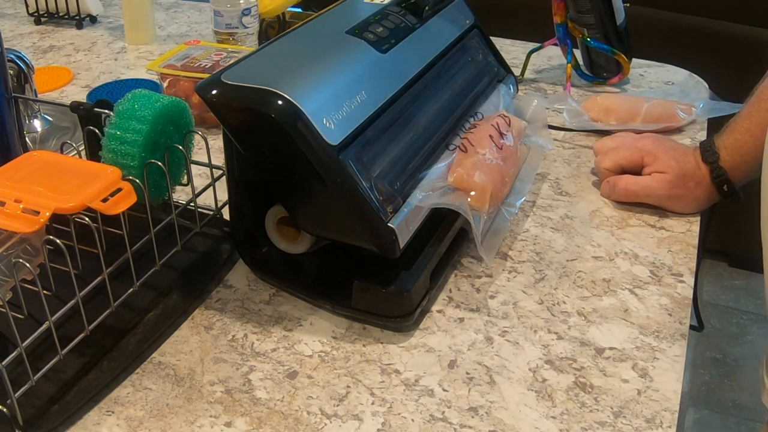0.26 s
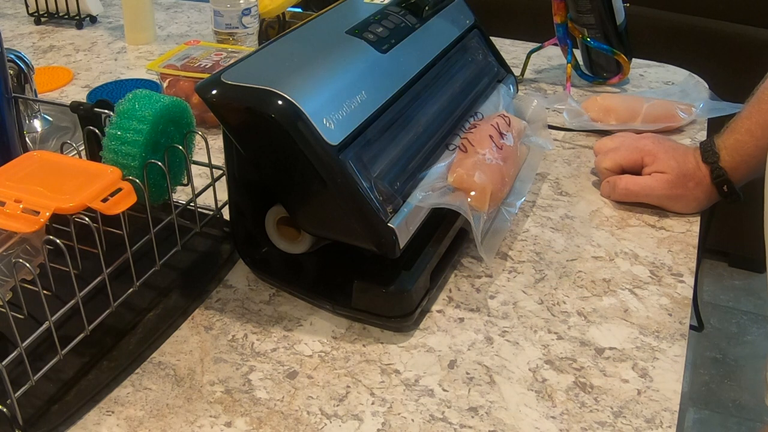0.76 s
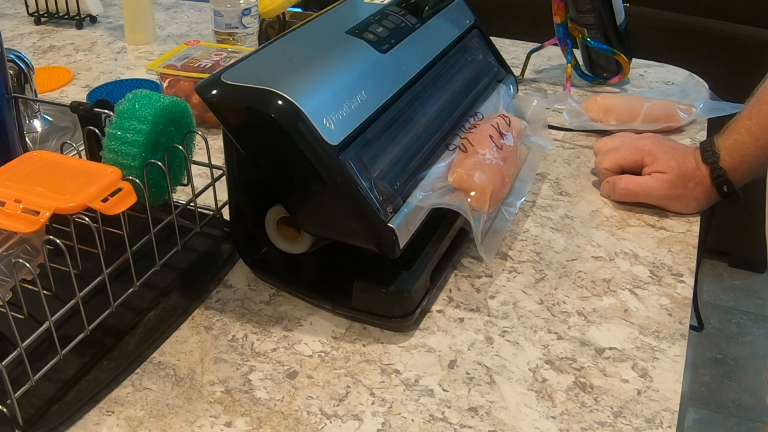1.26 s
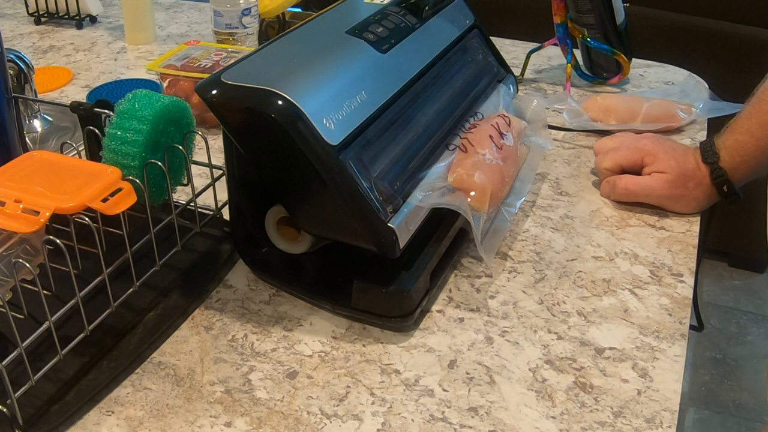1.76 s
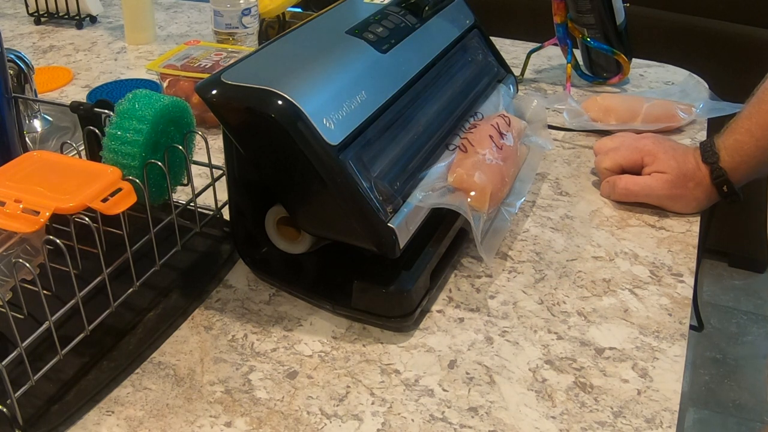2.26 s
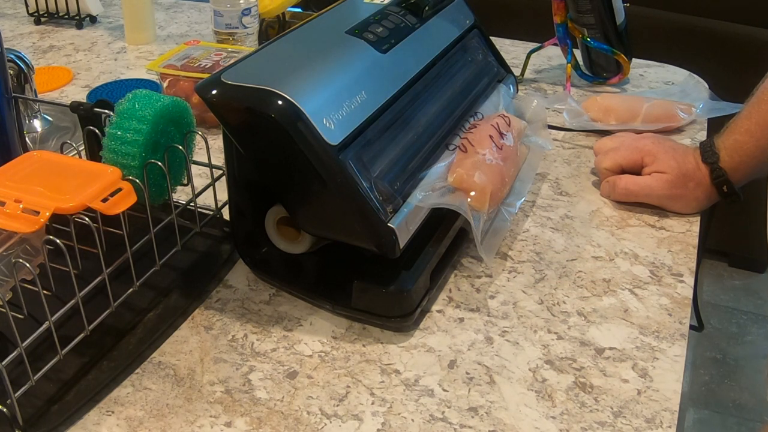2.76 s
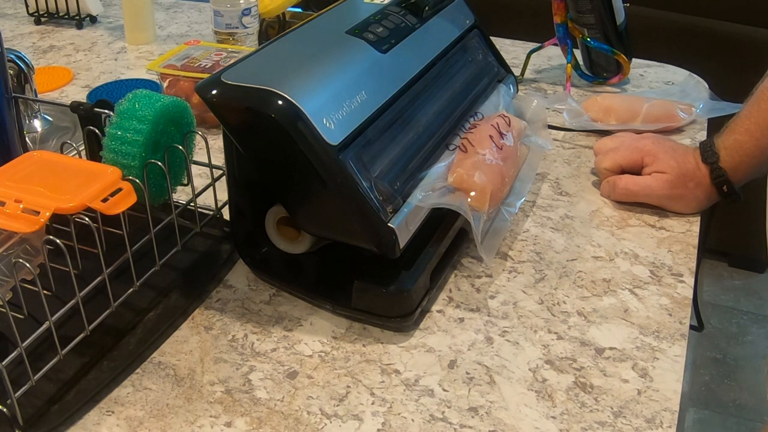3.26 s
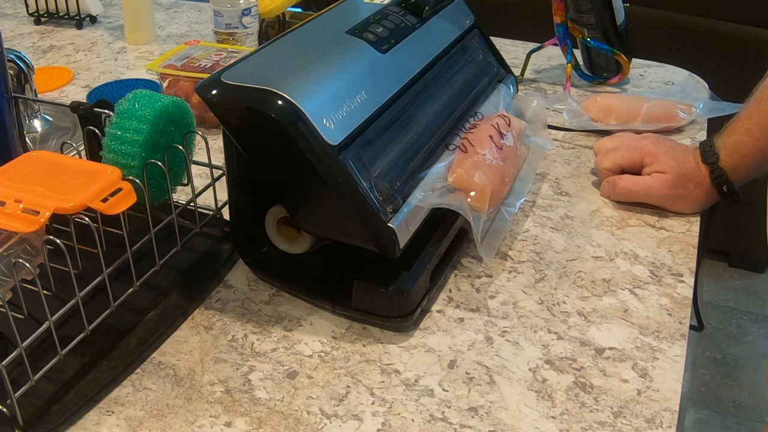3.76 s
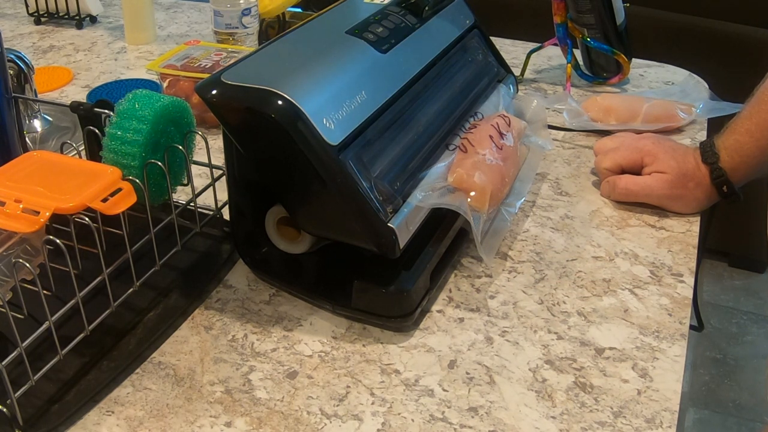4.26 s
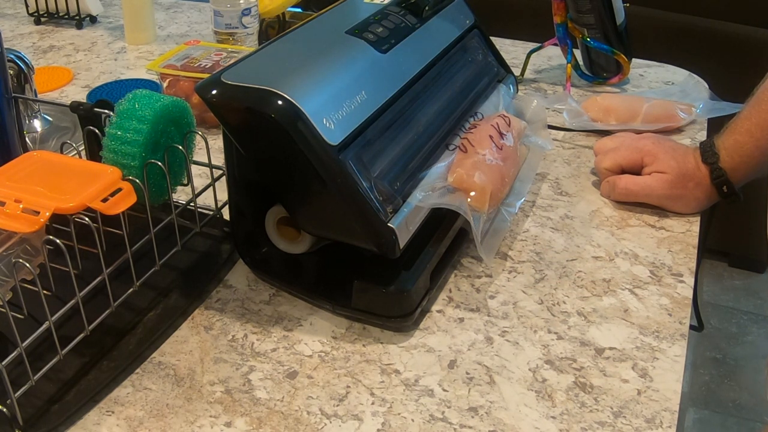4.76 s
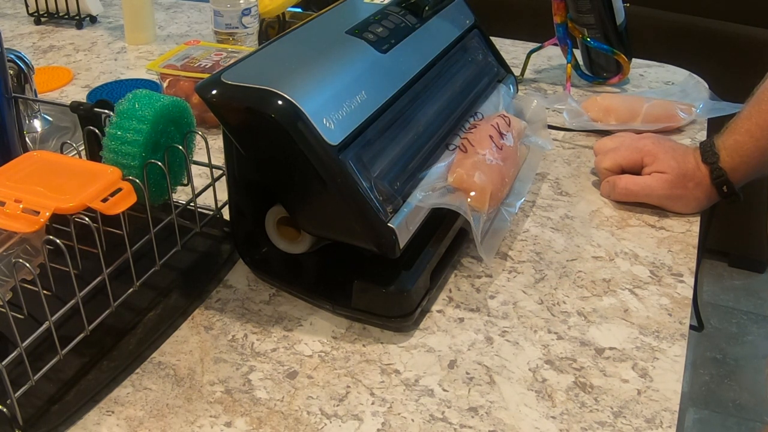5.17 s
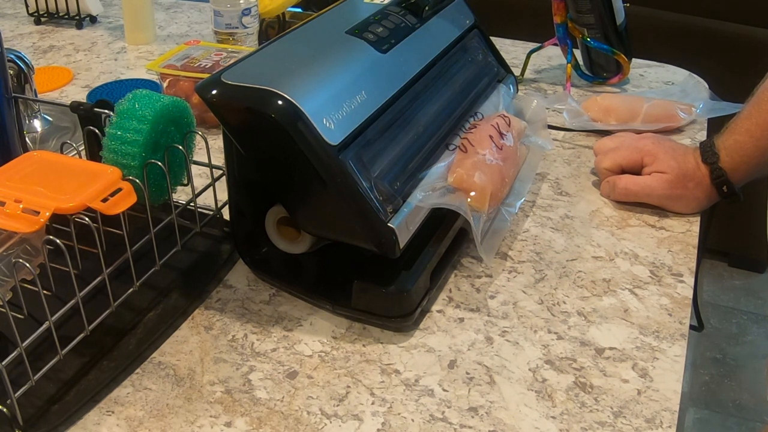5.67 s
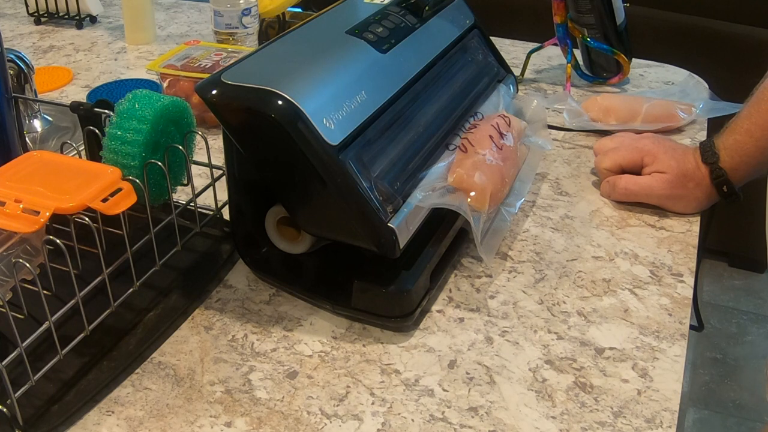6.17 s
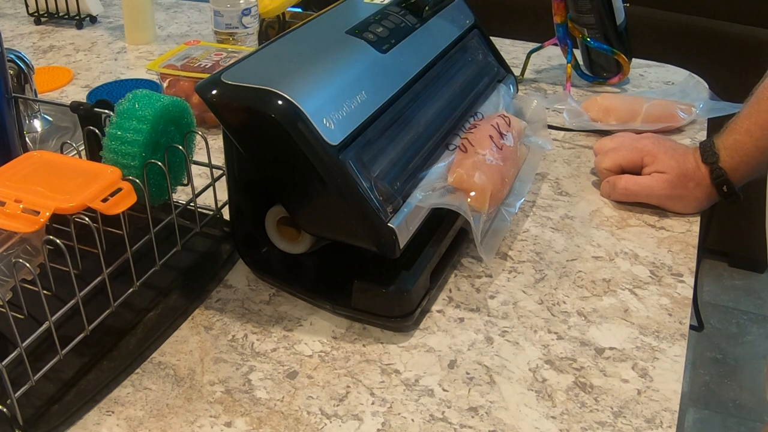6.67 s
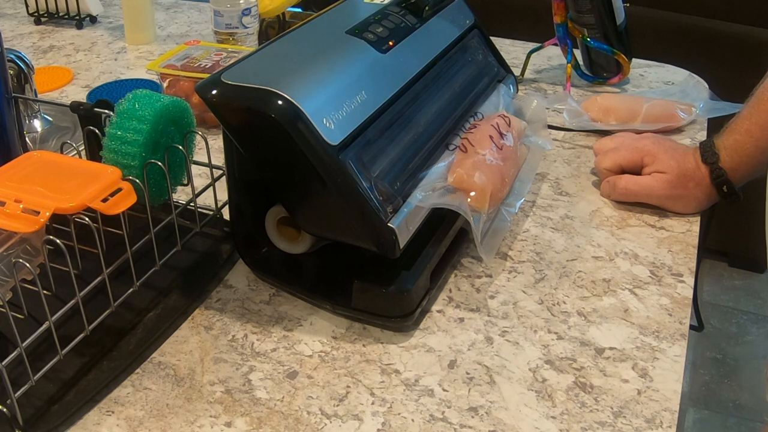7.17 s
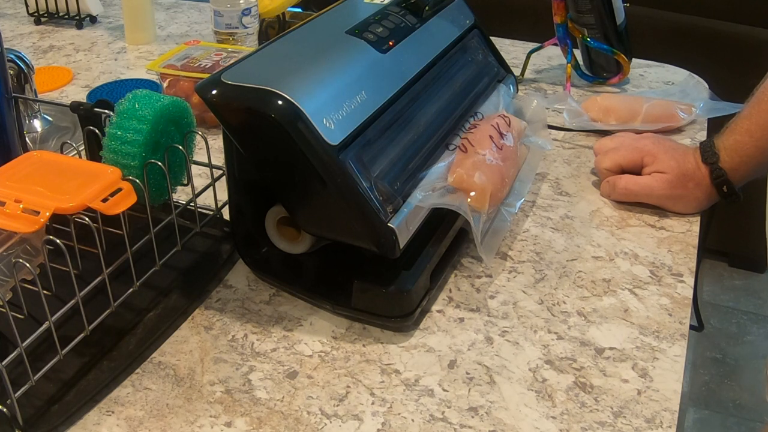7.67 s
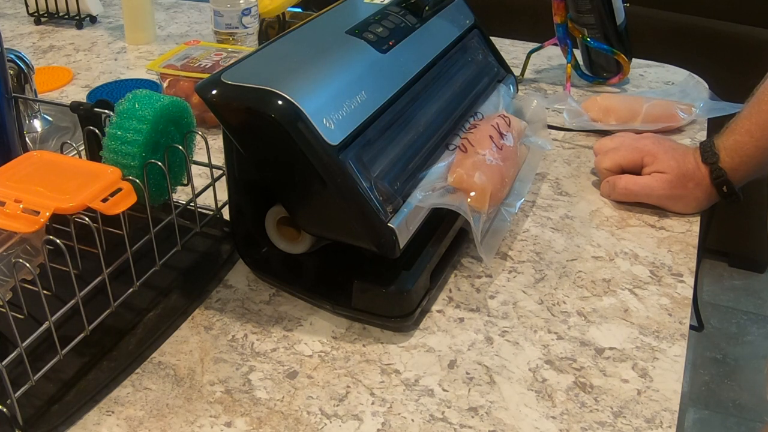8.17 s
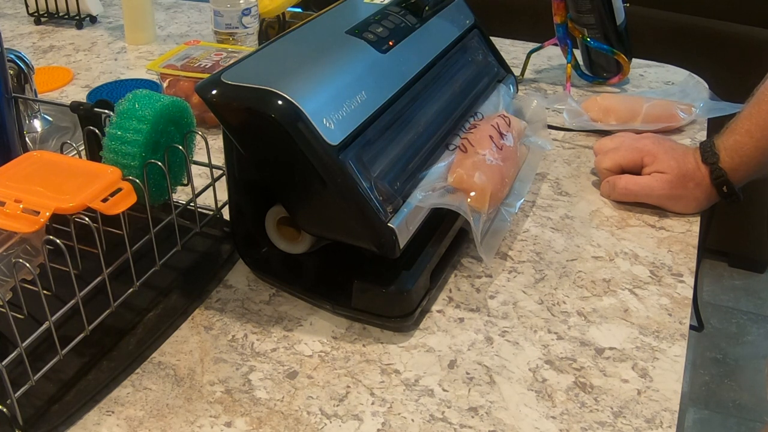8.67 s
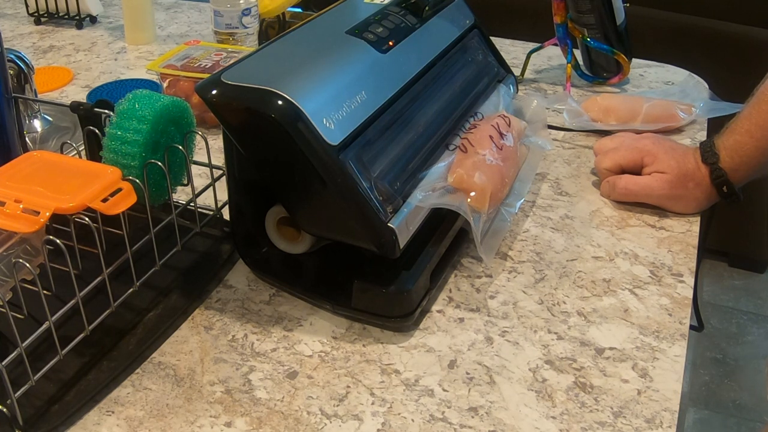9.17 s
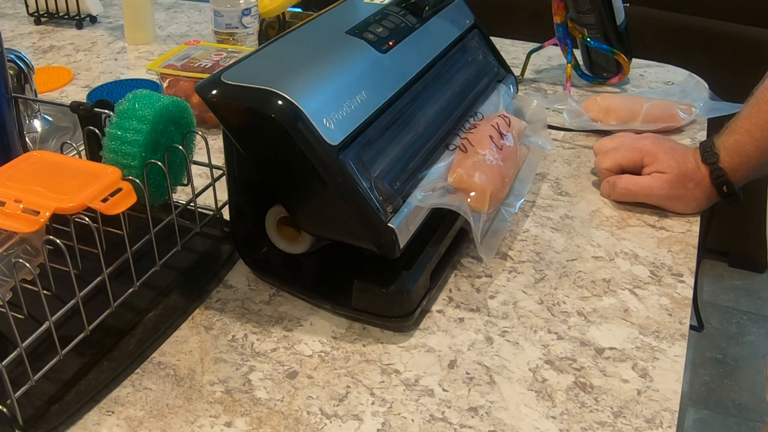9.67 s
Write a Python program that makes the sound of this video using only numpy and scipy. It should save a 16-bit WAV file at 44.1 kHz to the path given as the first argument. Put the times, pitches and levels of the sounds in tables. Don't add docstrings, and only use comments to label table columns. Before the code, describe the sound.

A small vacuum sealer pump hums and rattles loudly on a kitchen counter, then cuts off with a click and clunk, leaving a faint refrigerator drone.

```python
import sys
import numpy as np
from scipy import signal
from scipy.fft import rfft, irfft, next_fast_len
from scipy.io import wavfile

SR = 44100
rng = np.random.default_rng(int(sys.argv[2]) if len(sys.argv) > 2 else 0)


def ratio_of_db(decibels):
    return 10 ** (np.asarray(decibels, float) / 20)


def materialize(psi):
    bounded = np.clip(np.atleast_2d(psi).T, -1, 1)
    quanta = np.round(bounded * 32767).astype(np.int16)
    wavfile.write(sys.argv[1], SR, quanta)


N = 437899
TIME = np.arange(N) / SR
PADDED = next_fast_len(N + SR)
BIN_HZ = np.maximum(np.arange(PADDED // 2 + 1) * SR / PADDED, 1)


# t/s, speed/turns per s
MOTOR_SPEED = [
    (0, 99.6),
    (0.75, 100.6),
    (1.6, 101.02),
    (2.8, 101.27),
    (3.6, 101.07),
    (4.0, 101.65),
    (4.7, 101.8),
    (6.4, 101.62),
    (7.2, 101.72),
]
# t/s, peak level/dB
KNOCKS = [
    (7.217, -10.5),
    (7.276, -23.5),
    (7.2944, -34),
    (7.3203, -32),
    (7.39, -34),
    (7.4394, -37.5),
]
# f/Hz, side minus mid level/dB
PUMP_WIDTH = [(30, -12), (60, -30.5), (110, -18.5), (200, -43.5), (370, -13), (690, -5.5), (1270, -5.5),
              (2330, -12), (4290, -13.5), (7890, -2), (14500, -3.5)]
# f/Hz, left minus right level/dB
PUMP_TILT = [(60, -1.0), (110, -1.0), (200, 0.0), (370, -0.5), (690, -1.0), (1270, -1.5), (2330, -0.5),
             (4290, -0.5), (7890, -2.0), (14500, -1.0)]


def pump():
    cut_s, cut_turn = 7.22, .98
    share, hum_gain, stop_db, shudder_db = run_down(cut_s)
    turns = np.cumsum(np.interp(TIME, *np.transpose(MOTOR_SPEED)) * share) / SR
    turns = turns + 1 + (cut_turn - turns[round(cut_s * SR)]) % 1
    seated = ramp(3.8, 0.15)

    hum = crank_hum(turns, hum_gain)
    orders = valve_orders(turns, seated)
    clatter = case_clatter(turns, stop_db)
    buzz = lid_buzz(turns, seated, stop_db)
    shudder = case_shudder(shudder_db)
    knocks = ratio_of_db(-9) * bursts(KNOCKS, t60=.03, low_hz=900, high_hz=4800)

    near = hum + orders + clatter.sum(axis=0) + buzz + shudder + knocks
    sent_to_room = ratio_of_db(-26) * hum + ratio_of_db(-14) * orders + ratio_of_db(-4) * buzz + knocks
    far_mid, far_side = kitchen(np.vstack([sent_to_room, clatter]))
    both = spread(near + ratio_of_db(-0.5) * far_mid, ratio_of_db(5.0) * far_side, PUMP_WIDTH)
    return colour(both, np.outer([.5, -.5], at_hz(PUMP_TILT, BIN_HZ)))


# order/per turn, level/dB, level of line just above/dB, level of line just below/dB
LOOSE_BAG = [(1, -17, -53, -56), (2, -40.5, -58, -68), (3, -28, -43.5, -55), (4, -30.5, -51.5, -55.5),
             (5, -51.5, -40.5, -57.5), (6, -37.5, -35.5, -47.5), (7, -37.5, -34, -45), (8, -38, -35, -51),
             (9, -32, -41, -46), (10, -43, -51.5, -51.5), (11, -36.5, -44, -50.5), (12, -37, -43, -42),
             (13, -40, -42, -51.5), (14, -42.5, -49, -48), (15, -44.5, -45, -54.5), (16, -45.5, -50, -49),
             (17, -46, -54, -53), (18, -41.5, -50, -49), (19, -52.5, -55, -58), (20, -52, -53.5, -53.5)]
TIGHT_BAG = [(1, -17, -52, -56), (2, -42.5, -53, -68), (3, -27.5, -44.5, -56), (4, -28, -57, -61.5),
             (5, -38.5, -56, -57), (6, -38.5, -38.5, -42.5), (7, -28.5, -45.5, -45.5), (8, -34.5, -47, -51),
             (9, -34, -50, -43.5), (10, -39, -63, -50.5), (11, -35, -41.5, -51), (12, -35.5, -41, -52),
             (13, -37.5, -47.5, -55), (14, -45.5, -49.5, -41.5), (15, -38.5, -48.5, -52.5),
             (16, -40.5, -51.5, -53), (17, -50.5, -49, -57), (18, -56, -52.5, -50), (19, -49, -55, -52.5),
             (20, -50, -56.5, -50.5)]


def valve_orders(turns, seated):
    third_db = -7 * np.exp(-TIME / 1)
    fourth_db = 4.5 * (1 - ramp(1.02, .6))
    with_air_db = {3: third_db, 4: fourth_db}
    ripple = 2 * np.pi * 120.0 * TIME
    out = np.zeros(N)
    for (k, *loose), (_, *tight) in zip(LOOSE_BAG[1:], TIGHT_BAG[1:]):
        k = round(k)
        main, above, below = (a + (b - a) * seated for a, b in zip(loose, tight))
        main = main + with_air_db.get(k, 0)
        phase = np.angle(1 - np.exp(-k / 9 - 2j * np.pi * k * .4))
        phase += 1.1 * rng.standard_normal() * (k > 4)
        beat_db = 0.99 * drift(7.9)
        waver = .007 * k * drift(9)
        start = rng.uniform(0, 2 * np.pi, 2)
        above_angle = 2 * np.pi * (k - 1) * turns + ripple + start[0] + waver
        below_angle = 2 * np.pi * (k + 1) * turns - ripple + start[1] + waver
        out += ratio_of_db(main + 0.41 * drift(1.6)) * np.cos(2 * np.pi * k * turns + phase + waver)
        out += ratio_of_db(above + beat_db) * np.cos(above_angle)
        out += ratio_of_db(below - beat_db) * np.cos(below_angle)
    quiet_s, fade_db_per_s = 7.238, 900
    fade_db = -fade_db_per_s * np.clip(TIME - quiet_s, 0, 1)
    return np.sqrt(2) * ratio_of_db(fade_db) * out


def crank_hum(turns, gain):
    return np.sqrt(2) * ratio_of_db(-16.5) * gain * np.cos(2 * np.pi * turns)


# f/Hz, level/dB per Hz
CLATTER_COLOUR = [(30, -14), (75, -4), (150, -3.5), (370, -5), (520, 0), (2000, -4), (4200, -5), (4400, -7),
                  (6600, -15), (10500, -22.5), (11400, -38.5), (11900, -34.5), (14200, -37.5), (14600, -52)]
# f/Hz, width/Hz, level/dB
CASE_MODES = [(1360, 140, 1.5), (1807, 120, -1), (2243, 170, 1.5), (2440, 58, -0.5), (2707, 320, 6.5),
              (3480, 110, 5.5), (3700, 217, 4), (4080, 170, 3.5), (5100, 300, 2), (7920, 200, 4),
              (8350, 530, 2.5)]


def case_clatter(turns, stop_db):
    case_db = at_hz(CLATTER_COLOUR, BIN_HZ) + 10 * np.log10(1 + humps(CASE_MODES))
    panels = rng.integers(0, 4, N) == np.arange(4)[:, None]
    contacts = rattle(turns, depth_db=5.5, at_turn=.78, grain_db=3.0)
    panel_sounds = rms_one(colour(panels * contacts, case_db)) / 2
    return ratio_of_db(-28 + stop_db) * panel_sounds


# f/Hz, width/Hz, level/dB
LID_MODES = [(641, 19, 0), (739, 70, 1), (800, 100, -1.5)]


def lid_buzz(turns, seated, stop_db):
    loose_db, sealed_db = -36, -40.5
    level_db = loose_db + (sealed_db - loose_db) * seated + stop_db
    contacts = rattle(turns, depth_db=19.0, at_turn=0.94, grain_db=4.5)
    return ratio_of_db(level_db) * rms_one(colour(contacts, 20 * np.log10(humps(LID_MODES))))


def rattle(turns, depth_db, at_turn, grain_db):
    since_slam = turns - at_turn
    force_db = 2.6 * rng.standard_normal(1000)[since_slam.astype(int) % 1000]
    slam = np.exp(-(since_slam % 1) / .2)
    contact = rng.random(N) < 6000 / SR
    grains = ratio_of_db(grain_db * np.minimum(rng.exponential(1, N), 5)) * contact * rng.choice([-1, 1], N)
    level = ratio_of_db((depth_db + force_db) * slam + 1.67 * drift(36))
    return rms_one(level * (grains + 0.36 * rng.standard_normal(N)))


def case_shudder(level_db):
    return ratio_of_db(level_db) * rms_one(colour(rng.standard_normal(N), 20 * np.log10(humps([(190, 390, 0)]))))


# start t/s, length/s, level against the hum/dB
ROCKS = [
    (7.287, 0.033, -14),
    (7.324, .075, -19),
    (7.408, 0.057, -34),
]


def run_down(cut_s):
    coast_s, coast_loss = .22, .45
    share = 1 - coast_loss * (1 - np.exp(-np.maximum(TIME - cut_s, 0) / coast_s))

    stall_s, stall_fade_s, push_db = 7.262, 0.0099, -2
    hum = ratio_of_db(push_db * ramp(stall_s - .03, .04)) * (1 - ramp(stall_s + stall_fade_s / 2, stall_fade_s))
    for s, length, db in ROCKS:
        hum = hum + ratio_of_db(db) * np.sin(np.pi * ramp(s + length / 2, length))

    quiet_s, fade_db_per_s = 7.202, 230
    stop_db = -fade_db_per_s * np.clip(TIME - quiet_s, 0, 1)

    shudder_s, peak_db, rise_db_per_s, fall_db_per_s = 7.28, -28.5, 400, 156
    late = np.clip(TIME - shudder_s, -1, 1)
    shudder_db = peak_db + np.minimum(rise_db_per_s * late, -fall_db_per_s * late)
    return share, hum, stop_db, shudder_db


# f/Hz, t60/s
KITCHEN_T60 = [(60, 0.25), (160, 0.56), (420, 0.6), (1100, 1), (2910, 0.51), (7680, 0.62)]


def kitchen(parts):
    t, tail = np.arange(SR) / SR, 0
    for low in 40 * 2. ** np.arange(9):
        band = signal.butter(2, [low, min(2 * low, .45 * SR)], "band", fs=SR, output="sos")
        fade = ratio_of_db(-60 * t / at_hz(KITCHEN_T60, low * np.sqrt(2))) * (t > .006)
        tail = tail + fade * signal.sosfilt(band, rng.standard_normal((2, len(parts), SR)))
    tail = tail / np.sqrt(np.sum(tail ** 2, axis=2, keepdims=True))
    wet = np.sum(rfft(parts, PADDED) * rfft(tail, PADDED), axis=1)
    return irfft(wet, PADDED)[:, :N]


# f/Hz, level/dB per Hz
DRONE_COLOUR = [(25, -8.5), (42, -12), (60, -23), (110, -21.5), (160, -0.5), (200, -3.5), (320, -1),
                (750, -13.5), (820, -18), (1600, -19.5), (3000, -37), (9000, -41.5), (10800, -58),
                (11500, -74.5)]
# f/Hz, side minus mid level/dB
DRONE_WIDTH = [(60, -5.5), (110, -2), (200, -12), (370, -11.5), (690, 2), (1270, 0.5), (2330, -2),
               (4290, -2.5), (7890, 3), (14500, 0)]
# f/Hz, level/dB
WHINE = [(43.1, -75), (199.2, -64.5), (290.7, -64.5), (360.7, -57), (721.4, -69), (2008, -84.5),
         (3548, -93), (5082, -88), (5259, -95), (5911, -100), (8333, -92.5), (8926, -90), (8985, -95),
         (10169, -102)]


def refrigerator():
    hiss_db = 10 * np.log10(1 + humps([(10300, 220, 11), (7200, 240, 3)]))
    mid, side = colour(rng.standard_normal((2, N)), at_hz(DRONE_COLOUR, BIN_HZ) + hiss_db)
    air = rms_one(spread(mid, side, DRONE_WIDTH)) * ratio_of_db(1.3 * drift(4))
    throb = 1 + .4 * np.cos(2 * np.pi * 59 * TIME)
    lines = 0
    for hz, db in WHINE:
        line = ratio_of_db(db + 2.0 * drift(4)) * np.cos(2 * np.pi * hz * TIME + 0.65 * drift(5.9))
        lines = lines + np.sqrt(2) * line * (throb if hz > 3000 else ratio_of_db(1.5))
    balance = ratio_of_db([[-.45], [.45]])
    return ratio_of_db(-55 + room_gain_db(TIME)) * balance * (air + ratio_of_db(53.5) * lines)


def watch():
    first_s, gap_s, level_db, spread_db = 7.788, .1684, -68, 1.5
    s = np.arange(first_s, N / SR, gap_s)
    db = level_db + room_gain_db(s) + spread_db * rng.standard_normal(len(s))
    return ratio_of_db(1.0) * bursts(zip(s, db), t60=.07, low_hz=6900, high_hz=8600)


def room_gain_db(s):
    return 1.45 * np.maximum(s - 7.8, 0)


def bursts(events, t60, low_hz, high_hz):
    out, t = np.zeros(N + 2000), np.arange(2000) / SR
    shape = ratio_of_db(-60 * t / t60) * np.minimum(t / .001, 1)
    for s, db in events:
        at = round(s * SR)
        out[at:at + 2000] += ratio_of_db(db) * rng.standard_normal(2000) * shape
    band = signal.butter(2, [low_hz, high_hz], "band", fs=SR, output="sos")
    return signal.sosfilt(band, out[:N])


def spread(mid, side, width):
    side = colour(side, at_hz(width, BIN_HZ))
    return np.array([mid + side, mid - side])


def colour(x, db_per_bin):
    return irfft(rfft(x, PADDED) * ratio_of_db(db_per_bin), PADDED)[..., :N]


def humps(modes):
    return sum(ratio_of_db(2 * db) / (1 + (2 * (BIN_HZ - hz) / width) ** 2) for hz, width, db in modes)


def at_hz(points, hz):
    points = np.array(points)
    return np.interp(np.log(hz), np.log(points[:, 0]), points[:, 1])


def drift(rate):
    r = np.exp(-200 * np.pi * rate / SR)
    slow = signal.lfilter([1], [1, -2 * r, r * r], rng.standard_normal(N // 100 + 2002))[2000:]
    return np.interp(np.arange(N) / 100, np.arange(len(slow)), rms_one(slow))


def ramp(middle_s, length_s):
    return np.clip((TIME - middle_s) / length_s + .5, 0, 1)


def rms_one(x):
    return x / np.sqrt(np.mean(x ** 2) + 1e-20)


def scene():
    return pump() + refrigerator() + watch()


def top_cut(x):
    return signal.sosfilt(signal.butter(12, 15120, fs=SR, output="sos"), x)


def record(dry):
    top = .9
    mix = top * np.tanh(dry / top)
    return top_cut(mix)


dry = scene()
out = record(dry)
materialize(out)
```